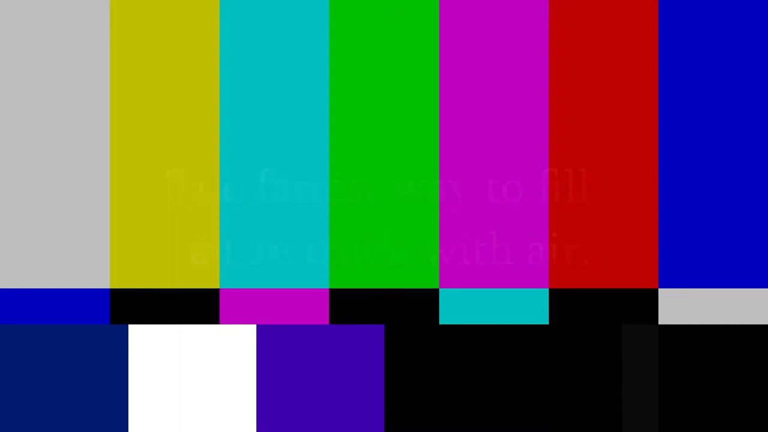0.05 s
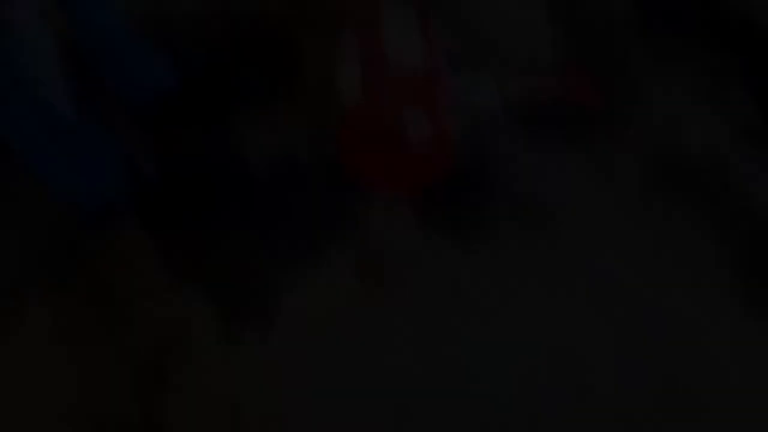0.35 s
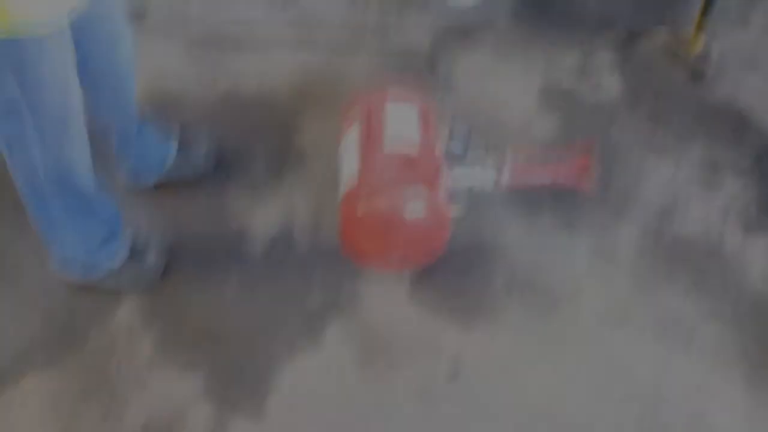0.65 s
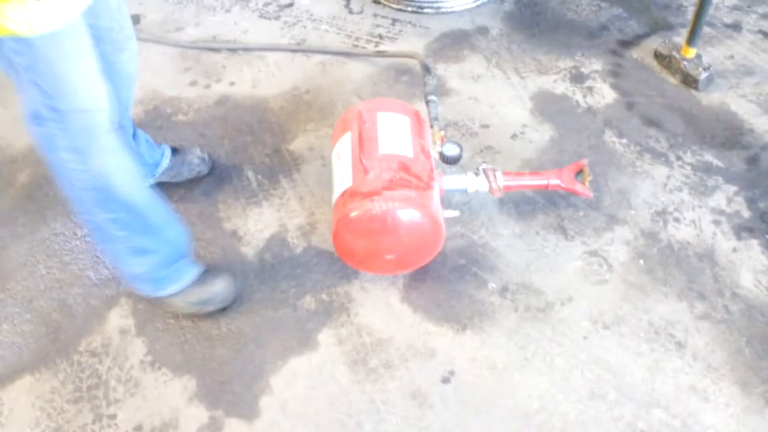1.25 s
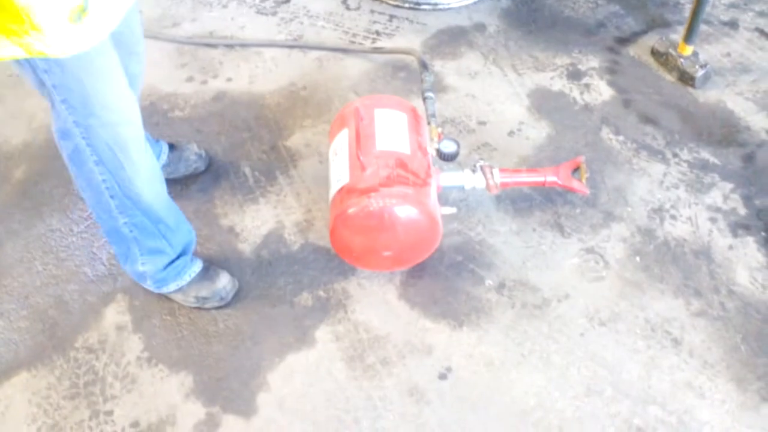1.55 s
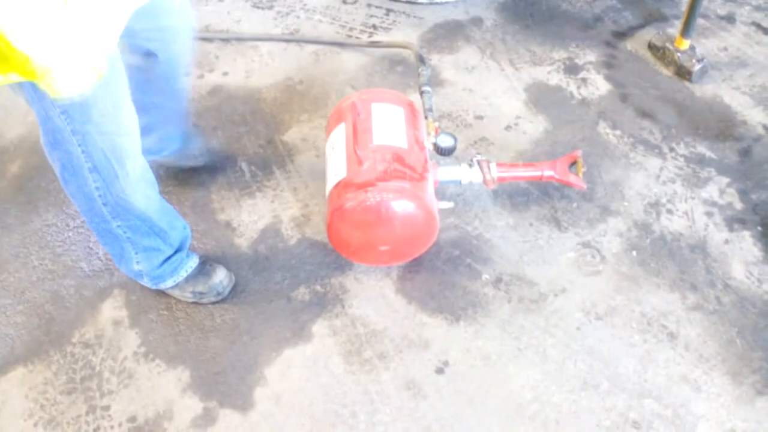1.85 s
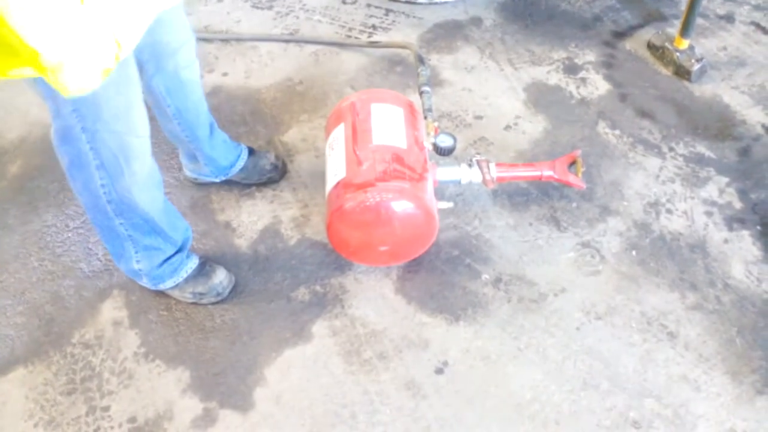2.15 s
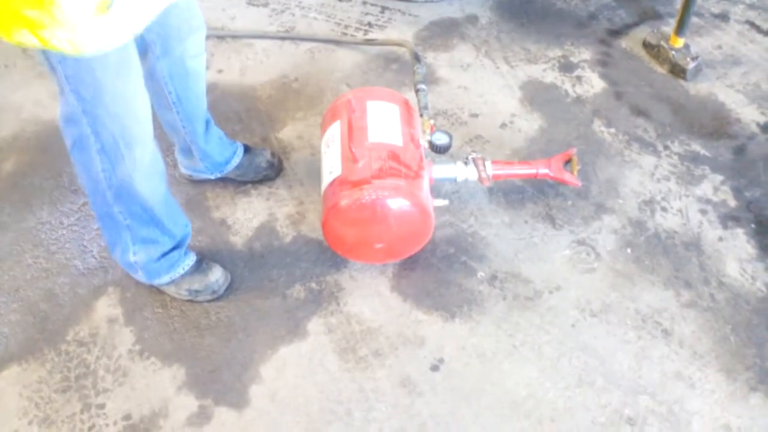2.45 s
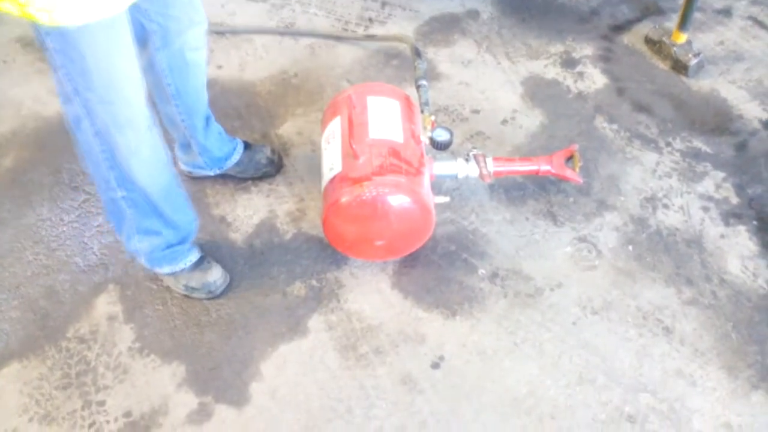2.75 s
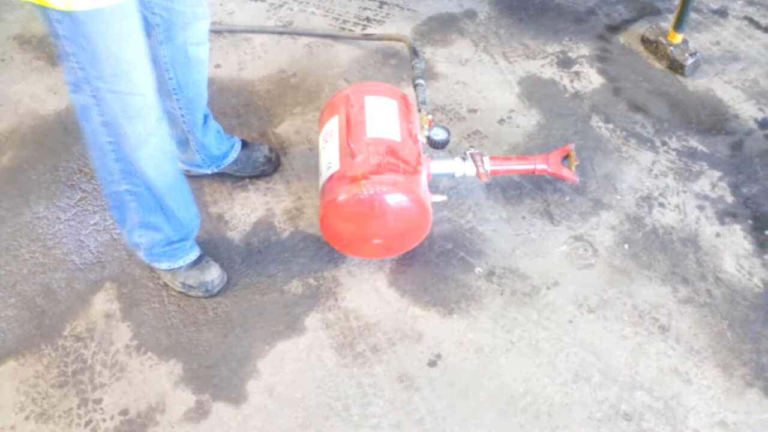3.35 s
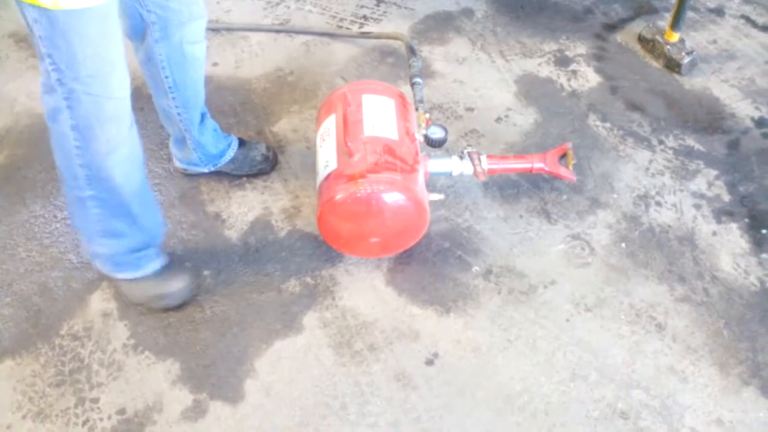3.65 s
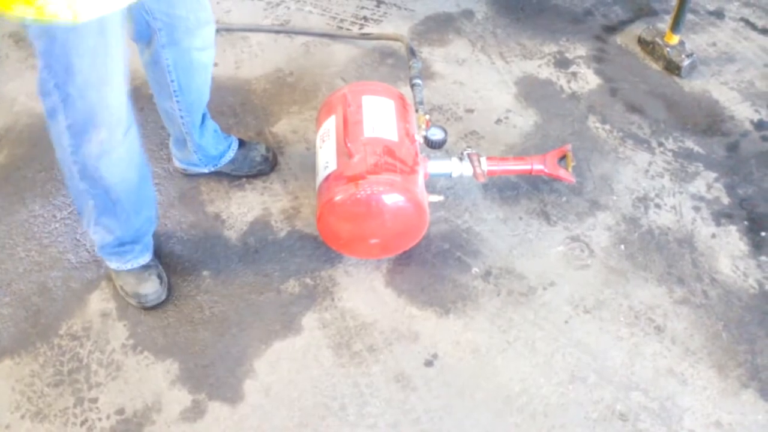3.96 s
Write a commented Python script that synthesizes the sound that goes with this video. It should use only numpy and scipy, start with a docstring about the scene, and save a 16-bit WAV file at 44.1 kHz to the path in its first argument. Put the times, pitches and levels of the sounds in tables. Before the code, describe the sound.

An engine and air compressor drone steadily while air hisses into a steel tank.

```python
"""An engine and an air compressor run steadily in a paved yard, while a hose fills a small steel air tank.
Each machine drones on the multiples of its cycle rate, over a shared roar of fan and exhaust and
a hollow, throbbing intake note. The inflow hisses and rings the tank, dying away as the pressure
evens out. A shoe scuffs once. The whole sound fades in."""
import sys
import numpy as np
from scipy import signal
from scipy.fft import rfft, irfft
from scipy.io import wavfile
from scipy.ndimage import uniform_filter1d

SR = 44100
rng = np.random.default_rng(int(sys.argv[2]) if len(sys.argv) > 2 else 0)


def unload_audio(sound):
    """Save the sound as a 16-bit wav file, at the path given as the first command line argument."""
    columns = np.transpose(np.atleast_2d(sound))
    # keep every value between -1 and 1, then stretch to whole-number steps
    steps = np.round(np.clip(columns, -1, 1) * 32767)
    wavfile.write(sys.argv[1], SR, steps.astype(np.int16))


N = 176400
T = np.arange(N) / SR
HZ = np.fft.rfftfreq(N, 1 / SR)


def amp(db):
    """Decibels to gain."""
    return 10 ** (np.asarray(db) / 20)


def unit(x):
    """Scales to rms 1."""
    return x / np.sqrt(np.mean(x ** 2) + 1e-20)


def colour(points):
    """Gain at each frequency, from (Hz, dB) points joined on a log-frequency axis."""
    hz, db = np.transpose(points)
    return amp(np.interp(np.log(HZ + 1), np.log(hz + 1), db))


def noise(gain):
    """Noise of rms 1, shaped by the given gain at each frequency."""
    return unit(irfft(rfft(rng.standard_normal(N)) * gain, N))


def wander(rate_hz):
    """Slow random movement of rms 1, up to about the given rate."""
    return noise((HZ > 0) / (1 + (HZ / rate_hz) ** 4))


def resonance(hz, width):
    """Gain curve of a steep-sided peak, with the same energy at any width."""
    return 1 / (1 + (1.6 * (HZ - hz) / width) ** 2) / np.sqrt(width)


def rotation(cycle_hz, drift=0.0015):
    """Cycles turned by a machine whose speed drifts a little."""
    return np.cumsum(cycle_hz * (1 + drift * wander(rate_hz=1.17))) / SR


# The engine's drone. Each row: multiple of the cycle rate, relative level in dB.
ENGINE_HARMONICS = [(4, -69), (5, -61.5), (6, -59.5), (7, -63), (8, -57.5), (9, -59.5), (11, -60),
                    (12, -66.5), (13, -67.5), (14, -55.5), (15, -57.5), (16, -63), (17, -60.5), (18, -66.5),
                    (19, -59.5), (20, -62), (21, -61.5), (25, -62), (27, -56.5), (29, -67), (30, -64),
                    (31, -70), (35, -65)]
# The compressor's drone. Each row: multiple of the cycle rate, relative level in dB.
COMPRESSOR_HARMONICS = [(5, -73), (6, -67), (7, -69.5), (9, -62), (10, -61), (11, -58.5), (13, -57.5),
                        (14, -58), (16, -68), (18, -55), (19, -67), (21, -61.5), (23, -63), (24, -64),
                        (25, -62), (26, -59.5), (27, -58), (28, -61), (29, -65), (30, -65), (31, -58),
                        (32, -55), (33, -50), (34, -59.5), (35, -56.5), (36, -65), (37, -64.5)]

def drone(turns, harmonics, waver=0.54):
    """A machine hums on the multiples of its cycle rate, each wavering in strength."""
    hum = np.zeros(N)
    for multiple, db in harmonics:
        strength = amp(db) * (1 + waver * wander(rate_hz=2.54))
        hum += strength * np.cos(2 * np.pi * (multiple * turns + rng.random()))
    return unit(hum)


def clatter(turns, per_cycle=4, decay_s=0.0042, spread_db=0.5):
    """Power envelope of mean 1: each stroke of the cycle is a burst with its own strength."""
    strokes = turns * per_cycle
    stroke_hz = strokes[-1] / T[-1]
    strengths = amp(spread_db * rng.standard_normal(per_cycle))
    age = (strokes % 1) / stroke_hz
    bursts = strengths[strokes.astype(int) % per_cycle] * np.exp(-age / decay_s)
    return bursts / bursts.mean()


# The colour of the fan and exhaust. Each row: frequency in Hz, relative level in dB.
ROAR_COLOUR = [(10, -20), (22, -20), (42, -15), (62, -16), (90, -8.5), (130, -5.5), (200, -7.5), (400, 0),
               (480, 1), (630, -4), (950, -4), (1400, -1.5), (1850, 0.5), (2270, -5.5), (2780, -7),
               (3190, -12.5), (3750, -13.5), (5200, -21), (5900, -18.5), (7010, -21), (7920, -30),
               (9400, -34.5), (11700, -34.5), (13200, -41.5), (15400, -46)]
# Resonances of the intake and casings. Each row: centre in Hz, width in Hz, level in dB.
CASING_MODES = [(282, 26, -57.5), (1043, 10, -65), (1611, 62, -49), (1864, 24, -52), (1960, 170, -52.5),
                (2114, 27, -62), (2256, 11, -61), (3720, 130, -61), (6800, 840, -64)]

def roar(engine_turns, compressor_turns, air_db=-38.3, patch_db=0.7, clatter_share=0.14):
    """Fan and exhaust noise in drifting patches, with the casing resonances, pulsed by the strokes."""
    spectrum = signal.stft(noise(colour(ROAR_COLOUR)), nperseg=512)[2]
    patches = uniform_filter1d(rng.standard_normal(spectrum.shape), size=7, axis=0)  # across frequency
    patches = unit(uniform_filter1d(patches, size=8, axis=1))  # across time
    air = unit(signal.istft(spectrum * amp(patch_db * patches), nperseg=512)[1][:N])
    casings = sum(amp(db) * noise(resonance(hz, width)) for hz, width, db in CASING_MODES)
    bursts = (clatter(engine_turns) + clatter(compressor_turns)) / 2
    pulsing = uniform_filter1d(np.sqrt(1 - clatter_share + clatter_share * bursts), size=40)
    return (amp(air_db) * air + casings) * pulsing


# The intake note swells and sinks. Each row: time in seconds, level in dB.
INTAKE_SWELLS = [(.3, -46), (.6, -39.5), (1, -43), (1.5, -50.5), (2.1, -45.5), (2.6, -50.5), (2.95, -43),
                 (3.3, -46.5), (4, -46)]

def intake(even_out_s=0.46):
    """Air rushes through a narrow resonance: a hollow, evenly throbbing note."""
    note = noise(resonance(hz=517.7, width=22.6))
    running_rms = np.sqrt(uniform_filter1d(note ** 2, size=int(even_out_s * SR)))
    times, db = np.transpose(INTAKE_SWELLS)
    return amp(np.interp(T, times, db)) * note / running_rms


# The steel tank's strongest ringing modes. Each row: frequency in Hz, relative level in dB.
TANK_MODES = [(2972, -62.5), (3042, -65.5), (3386, -60.5), (3644, -61.5), (3714, -63), (3887, -57.5),
              (4107, -64), (4188, -69), (4436, -60), (4484, -61), (4527, -62), (4565, -59), (4657, -67),
              (4710, -68), (4915, -62), (5033, -59), (5216, -75), (5642, -70), (5825, -69), (6417, -60.5),
              (6681, -65.5), (6842, -66), (6918, -68.5), (7208, -65), (7284, -66), (7725, -73)]
# Broader clusters of high tank modes. Each row: centre in Hz, width in Hz, relative level in dB.
TANK_CLUSTERS = [(7750, 50, -75), (8230, 40, -78), (10100, 90, -73), (10350, 120, -79), (11320, 380, -74),
                 (12400, 100, -82), (12620, 130, -75), (12820, 90, -78), (14400, 280, -78),
                 (15060, 130, -83)]
# The colour of the inflow's hiss. Each row: frequency in Hz, relative level in dB.
HISS_COLOUR = [(1500, -18), (3100, -10), (3800, 3), (4600, -0.5), (5400, -7), (6100, -9), (6900, -2.5),
               (7500, -12), (8600, -17), (10100, -21), (11000, -32), (15500, -40)]
# The inflow dies away. Each row: time in seconds, gain in dB on ring and hiss,
# gain in dB on clusters and sizzle.
INFLOW_DECAY = [(.2, 3, 4), (.33, 3, -2), (.45, 0.5, 1), (.7, -1, -2.5), (1.05, -3, -6), (1.7, -7, -6),
                (2.4, -13, -15), (4, -25, -25)]

def tank_filling(ring_db=-45.5, hiss_db=-45, sizzle_db=-71.5, ripple_db=6):
    """The inflow hisses and rings the tank's many modes, fading as the pressure evens out."""
    mode_power = sum((amp(db) * resonance(hz, width=17)) ** 2 for hz, db in TANK_MODES)
    ring = amp(ring_db) * noise(np.sqrt(mode_power))
    clusters = sum(amp(db) * noise(resonance(hz, width)) for hz, width, db in TANK_CLUSTERS)
    # A random ripple across the spectrum stands for the tank's many finer modes.
    ripple = uniform_filter1d(rng.standard_normal(len(HZ)), size=110)
    ripple = unit(uniform_filter1d(ripple, size=70))
    fine_modes = amp(ripple_db * np.tanh(ripple))
    hiss = amp(hiss_db) * noise(colour(HISS_COLOUR) * fine_modes)
    sizzle = amp(sizzle_db) * noise(resonance(hz=11900, width=3000) * fine_modes)
    times, body_db, top_db = np.transpose(INFLOW_DECAY)
    body = amp(np.interp(T, times, body_db)) * (ring + hiss)
    top = amp(np.interp(T, times, top_db)) * (clusters + sizzle)
    return body + top


# The colour of grit under a sole. Each row: frequency in Hz, relative level in dB.
GRIT_COLOUR = [(3000, -24), (8000, -14), (11300, 1), (13000, -5), (15500, -8)]

def shoe_scuff(start_s=2.132, level_db=-49, rise_s=0.0033, decay_s=0.011):
    """A sole grazes grit on the paving: one short, bright rasp."""
    age = np.maximum(T - start_s, 0)
    attack = np.minimum(age / rise_s, 1)
    decay = np.exp(-np.maximum(age - rise_s, 0) / decay_s)
    return amp(level_db) * attack * decay * noise(colour(GRIT_COLOUR))


def scene():
    """Both machines, the tank and the shoe, mixed in mono."""
    engine_turns = rotation(cycle_hz=19.46)
    compressor_turns = rotation(cycle_hz=15.736)
    engine = amp(-47.5) * drone(engine_turns, ENGINE_HARMONICS)
    compressor = amp(-44) * drone(compressor_turns, COMPRESSOR_HARMONICS)
    machines = engine + compressor + roar(engine_turns, compressor_turns) + intake()
    return (machines + tank_filling() + shoe_scuff())[None]


# The fade-in on the whole mix. Each row: time in seconds, gain in dB.
FADE_IN = [(0.197, -81), (0.2, -19), (.245, -11.5), (.27, -5.5), (.31, -6.5), (.4, -2), (.48, 0),
           (.62, 0.5), (1.1, 0), (4, 0)]

def record(dry, cutoff_hz=15520):
    """Fades in after a moment of silence and cuts the highest treble."""
    times, db = np.transpose(FADE_IN)
    faded = dry * amp(np.interp(T, times, db)) * (T > times[0])
    lowpass = signal.firwin(801, cutoff_hz, window=("kaiser", 9), fs=SR)
    return signal.oaconvolve(faded, lowpass[None], "same")


dry = scene()
out = record(dry)
unload_audio(out)
```